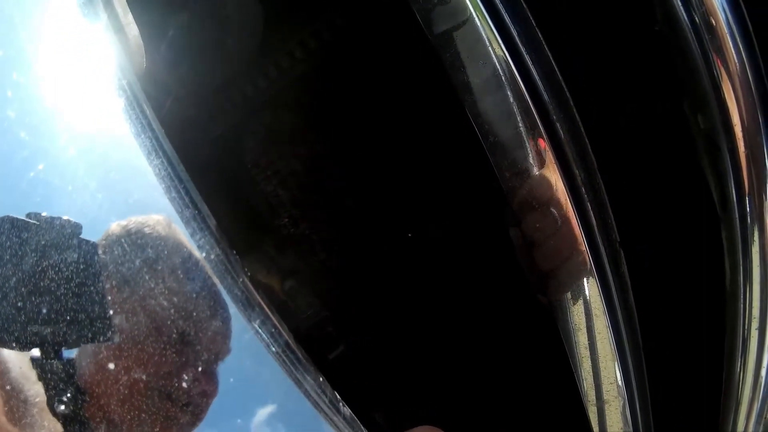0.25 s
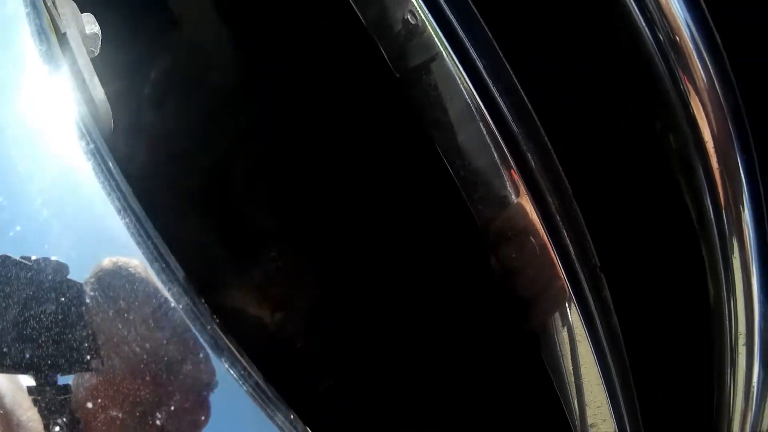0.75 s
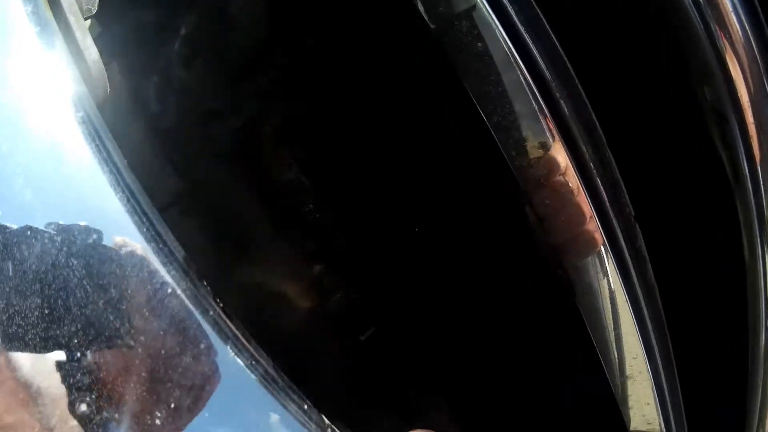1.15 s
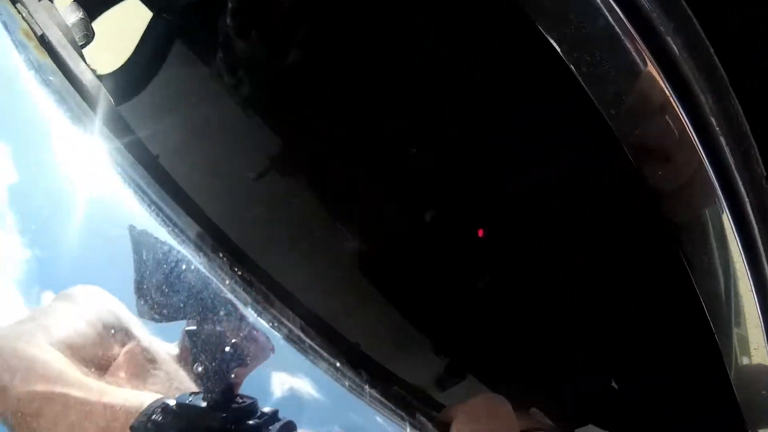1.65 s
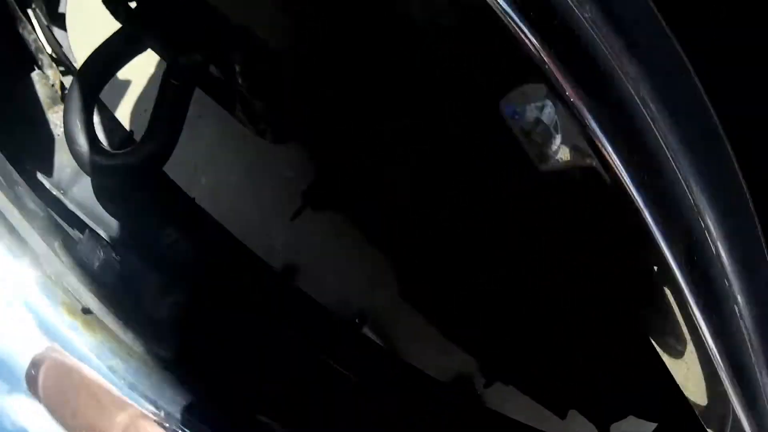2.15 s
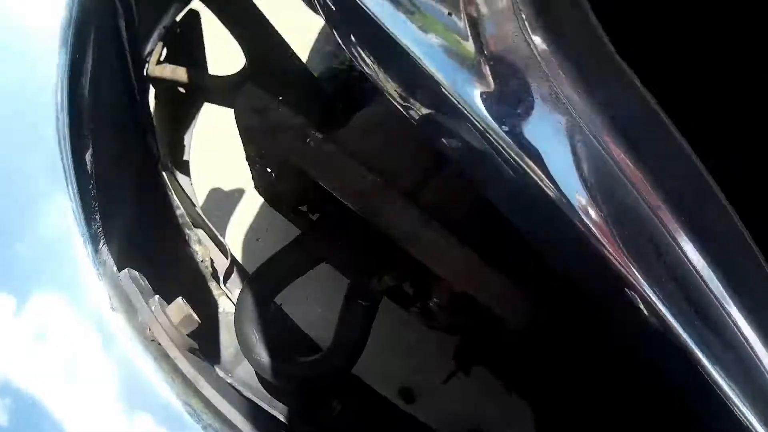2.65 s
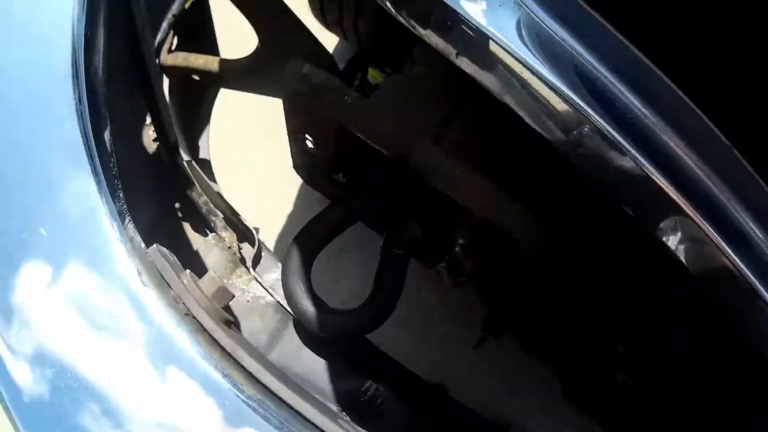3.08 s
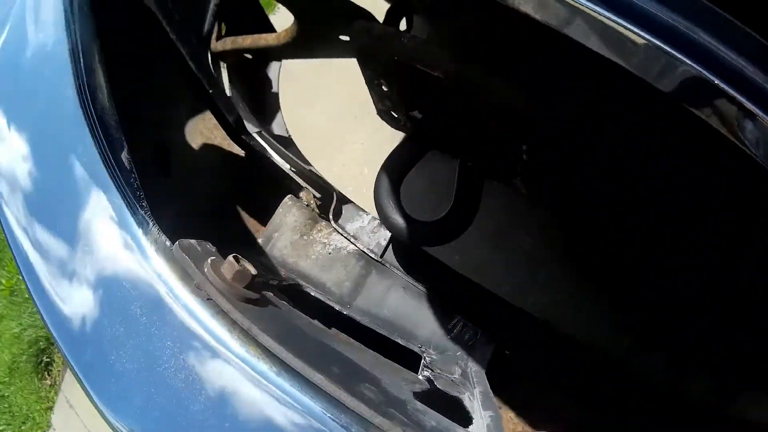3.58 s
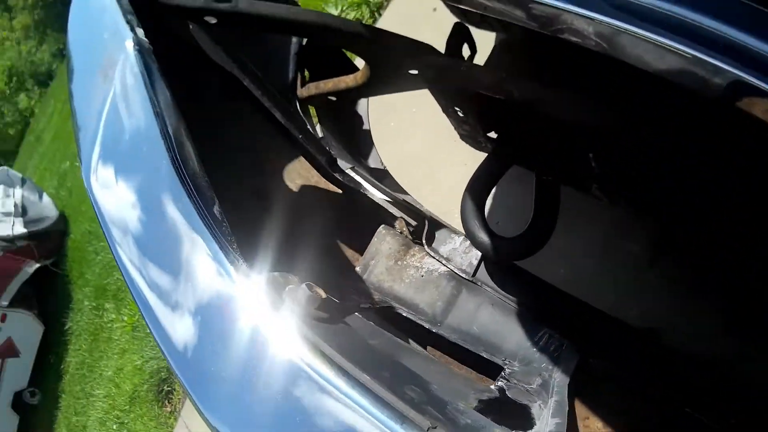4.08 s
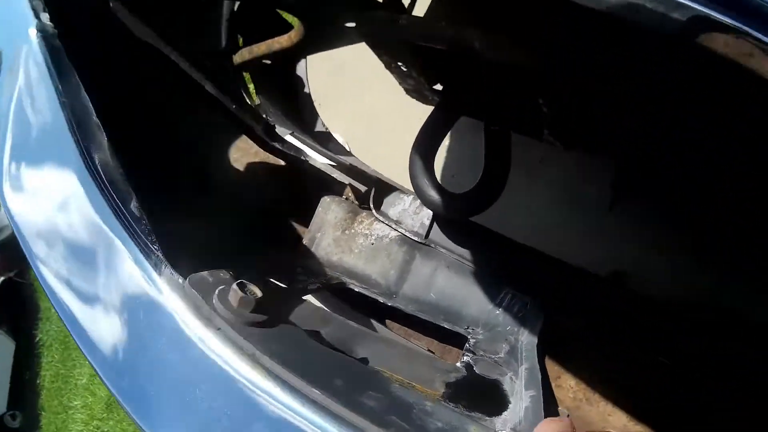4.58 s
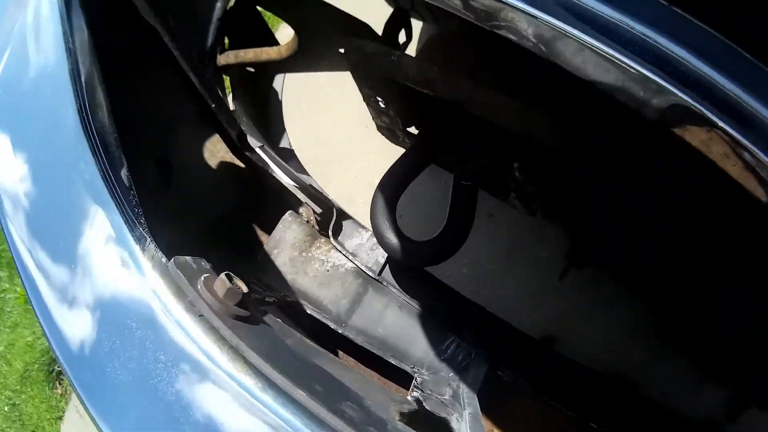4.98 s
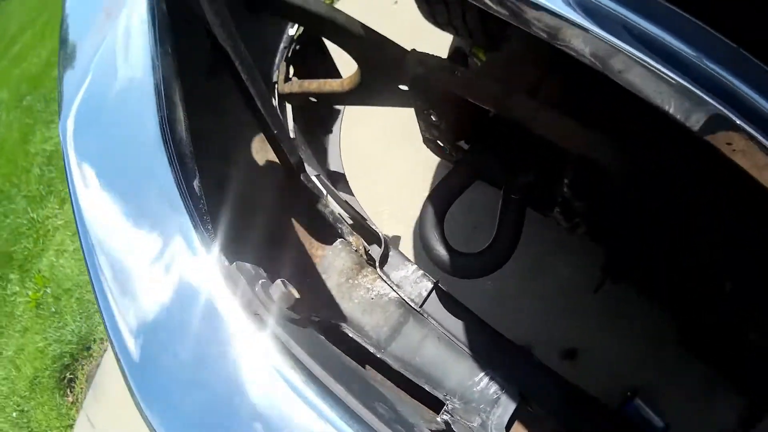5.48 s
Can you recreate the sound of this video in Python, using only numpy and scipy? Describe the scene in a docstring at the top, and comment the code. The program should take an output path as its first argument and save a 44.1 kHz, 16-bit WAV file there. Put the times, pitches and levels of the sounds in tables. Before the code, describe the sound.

Outdoors, a hand tool knocks, chatters and scrapes against a steel truck bumper, which rings briefly, with light handling rub underneath. A few dry plastic clicks snap right at the microphone. Faint taps follow, then a second bout of metal knocks and scrapes. The hand-held microphone is close to the work, with soft hiss, low rumble and a barely audible distant bird behind it.

```python
"""Outdoors, a hand-held microphone close to a steel truck bumper, where hand tools work at a fastener.
A far songbird opens, over low rumble, hum and the recorder's hiss. From 0.7 s a tool knocks, chatters
and scrapes on the bumper, which rings briefly; light handling rub runs underneath. From 2.1 to 2.6 s
dry plastic clicks snap right at the microphone. Faint taps follow, then from 4 s a second bout of
knocks and scrapes with two more clicks, and the hum comes up near the end."""
import sys
import numpy as np
from scipy import signal
from scipy.fft import rfft, irfft
from scipy.io import wavfile
from scipy.ndimage import uniform_filter1d

SR = 44100
rng = np.random.default_rng(int(sys.argv[2]) if len(sys.argv) > 2 else 0)


def unload_audio(sound):
    """Save the sound as a 16-bit wav file, at the path given as the first command line argument."""
    columns = np.transpose(np.atleast_2d(sound))
    # keep every value between -1 and 1, then stretch to whole-number steps
    steps = np.round(np.clip(columns, -1, 1) * 32767)
    wavfile.write(sys.argv[1], SR, steps.astype(np.int16))


N = 252683

# open air and hiss: (frequency [Hz], relative spectral density [dB])
AIR_SPECTRUM = [(20, -8), (60, -6), (130, -1.5), (250, -5.5), (500, -12), (1000, -17.5), (2500, -21),
                (5000, -25), (10000, -27), (15500, -30.5)]
# low hum: (time [s], level before trim [dB])
HUM_LEVELS = [(0, -59.5), (4.3, -64.5), (4.7, -49), (5.73, -54)]
# far bird: (time [s], level before trim [dB], starting pitch [Hz])
BIRD_WHISTLES = [(0.283, -68, 2270), (.39, -65, 2720), (.49, -64, 2280), (.59, -67, 2530),
                 (1.489, -56, 2390), (1.566, -57, 2480)]
# how hard the hand works, heard as rubbing: (time [s], level before trim [dB])
HAND_EFFORT = [(0.0, -66), (0.38, -68.5), (0.73, -48), (0.88, -39.5), (1.18, -38), (1.82, -58), (2.55, -48),
               (2.87, -63), (3.33, -60.5), (3.54, -54), (3.99, -56.5), (4.52, -46.5), (4.63, -34.5),
               (4.69, -55), (4.82, -70), (5.09, -45), (5.25, -50), (5.73, -40)]
# the registers thud, body, clang and edge: (low [Hz], high [Hz])
REGISTER_BANDS = [(70, 350), (350, 1150), (1150, 2800), (2800, 15000)]
# modes of the plastic housing: (frequency [Hz], relative level [dB], t60 [s])
HOUSING_MODES = [(273.5, -18.5, 0.079), (463, -8, 0.024), (870, 14.5, 0.0041), (948, -2, 0.031),
                 (1260, -7.5, 0.012), (1730, 2, 0.0075), (2250, -2.5, 0.0091), (2910, -16, 0.012),
                 (3400, -10.5, 0.0072), (4105, -7, 0.017), (4770, -3, 0.011), (5580, 0.5, 0.016),
                 (6750, -5.5, 0.0086), (10900, -19, 0.0097)]
# modes of bumper and bracket: (frequency [Hz], relative level [dB], undamped t60 [s])
BUMPER_MODES = [(119, -10, 0.145), (182, 1.5, 0.13), (255.5, -0.5, 0.28), (400, -12, 0.13),
                (475, -6.5, 0.014), (506, -3, 0.29), (582, 5, 0.086), (657, 3.5, 0.075), (733.6, -3, 0.55),
                (812.4, 11, 0.033), (937, 1, 0.13), (1053, -11, 0.33), (1280, -2.5, 0.19), (1335, -9, 0.32),
                (1448, 13.5, 0.022), (1550, -5, 0.31), (1638, -1.5, 0.081), (1682, 10.5, 0.064),
                (1775, -7.5, 0.16), (1818, 9.5, 0.039), (2032, 9, 0.028), (2090, -3, 0.11),
                (2500, -16, 0.12), (2695, -31, 0.063), (3400, -3, 0.073), (3800, 7, 0.049),
                (4180, 11, 0.024), (5520, -2.5, 0.18), (7300, -4, 0.12)]
# plastic clicks at the microphone: (time [s], body level [dB], thud [dB re body], clang [dB re body],
# edge [dB re body], relative after-ring [dB])
PLASTIC_CLICKS = [(2.0909, -12.5, -19.5, -8.5, -6.5, -9.5), (2.3916, -21, -21, -3, -14, -20),
                  (2.429, -38.5, 1, -1.5, -10, -32), (2.4689, -18, -3.5, 0.5, -10, -11.5),
                  (2.562, -36, -4, -19, -35, -26), (2.623, -29, -9.5, -4.5, -22, -19),
                  (4.245, -35.5, -17, -4.5, -23, -30), (5.2225, -28.5, -3, -11.5, -22, -19)]
# strokes of metal on metal: (time of hardest press [s], length [s], body level [dB],
# clang [dB re body], edge [dB re body], note of the spot [Hz])
TOOL_SCRAPES = [(1.408, 0.064, -37, 7.5, -12, 1304), (1.698, .056, -45, 15.5, -4, 1730),
                (1.725, 0.051, -40, 9, -18, 1417), (2.769, 0.065, -56.5, -1.5, -8, 2000),
                (3.774, 0.045, -56.5, -1.5, -17, 1087), (4.216, 0.045, -48.5, -1.5, -1, 1424),
                (4.645, 0.2, -47, 14.5, -2, 2107), (4.63, 0.053, -51, -3, 15.5, 3830),
                (4.779, .085, -32, -3.5, -13.5, 730), (5.15, 0.094, -41.5, 2.5, -4, 993),
                (5.44, 0.08, -40.5, -14.5, -14.5, 841), (5.558, 0.13, -48.5, -4, -7.5, 2190)]
# blows on the bumper: (time [s], body level [dB], thud [dB re body], clang [dB re body],
# edge [dB re body], rise [s], note of the spot [Hz])
TOOL_KNOCKS = [(0.7058, -18.5, -42, -20.5, -21, .0012, 1017), (0.7312, -30, -11, -20, -24, 0.0011, 1020),
               (0.9212, -34, -28, -12.5, -20.5, 0, 974), (0.997, -23, -6.5, 1, -27.5, 0.0038, 1482),
               (1.0502, -39, 6.5, -17, -31.5, 0, 584), (1.1827, -30.5, -8.5, -6.5, -41, .002, 1310),
               (1.2253, -40, -12, 10.5, -2, 0.00024, 2590), (1.2552, -13, -27, -6, -16, 0, 1346),
               (1.2853, -22.5, -21, 6.5, -5, 0, 1196), (1.6133, -28, -14, -4.5, -13.5, 0.0037, 1750),
               (1.638, -21, -28, 5, -4.5, 0.0027, 1600), (1.6712, -34, -11.5, 6.5, 1, 0.0012, 1750),
               (3.351, -48.5, -6, -12, -22, 0, 814), (3.4527, -54, 1, 2, -15, 0.0018, 1097),
               (3.5889, -48, -9, -13, -16, 0.0011, 510), (4.0752, -30, -6, -12, -27, 0.0024, 528),
               (4.4526, -33.5, -0.5, -10.5, -18.5, 0.0056, 838.5),
               (4.666, -14.5, -19, -13.5, -11, 0.0015, 842), (4.7238, -22.5, -25, 1, -4.5, 0.019, 740),
               (5.1529, -22.5, -12, -9, -20, 0.0041, 515), (5.3676, -36.5, -2.5, -14.5, -17.5, 0.0032, 837),
               (5.5777, -25, -2, -15.5, -22.5, 0, 660), (5.6566, -32, -3.5, -11, -26, 0, 647)]


def undb(db):
    """Decibels to gain."""
    return 10 ** (np.asarray(db) / 20)


def unit(x):
    """Scale to rms 1."""
    return x / np.sqrt(np.mean(x ** 2) + 1e-20)


def clock(length):
    """Sample times over a length in seconds."""
    return np.arange(int(length * SR)) / SR


def decay(t, t60):
    """Envelope that falls 60 dB in t60 seconds."""
    return np.exp(-np.log(1000) * t / t60)


def curve(rows):
    """Join (time, value) rows by straight lines."""
    return np.interp(np.arange(N) / SR, *np.transpose(rows))


def band(x, low_hz, high_hz, order=2):
    """Butterworth band-pass."""
    return signal.sosfilt(signal.butter(order, [low_hz, high_hz], "band", fs=SR, output="sos"), x)


def soften(x, hz, order=1):
    """Butterworth low-pass."""
    return signal.sosfilt(signal.butter(order, min(hz, SR / 2 - 1), fs=SR, output="sos"), x)


def add(out, start_s, x):
    """Mix x into out from start_s on."""
    i = int(start_s * SR)
    out[i:i + len(x)] += x[:N - i]


def wander(rate_hz):
    """Smooth random drift, rms 1."""
    hold = int(SR / rate_hz)
    steps = np.repeat(rng.standard_normal(N // hold + 1), hold)
    return unit(uniform_filter1d(steps, hold)[:N])


def contacts(n, per_s, spread_db):
    """Sparse tiny impacts of uneven size, rms 1."""
    impacts = (rng.random(n) < per_s / SR) * rng.choice([-1, 1], n)
    sizes = undb(spread_db * np.clip(rng.standard_normal(n), -2, 2))
    return unit(impacts * sizes)


def ring(modes, t):
    """Impulse response of a table of modes; neighbours swing in opposite senses."""
    return sum((-1) ** k * undb(db) * decay(t, t60) * np.sin(2 * np.pi * hz * t)
               for k, (hz, db, t60) in enumerate(modes))


def struck_at(modes, scatter_db):
    """Each contact lands on a new spot and favours other modes."""
    return [(hz, db + scatter_db * rng.standard_normal(), t60) for hz, db, t60 in modes]


def voiced(x, span_s, body_db, thud_db, clang_db, edge_db):
    """A contact's spot and hardness set each register's level, taken over the first span_s."""
    out = 0
    for (low_hz, high_hz), db in zip(REGISTER_BANDS, (thud_db, 0, clang_db, edge_db)):
        part = band(x, low_hz, high_hz, order=4)
        opening_rms = np.sqrt(np.mean(part[:int(span_s * SR)] ** 2))
        out = out + part * undb(body_db + db) / opening_rms
    return out


def air(level_db=-55.5):
    """Open air and steady hiss at the microphone, strongest in the lows."""
    hz, db = np.transpose(AIR_SPECTRUM)
    log_hz = np.log(np.fft.rfftfreq(N, 1 / SR) + 1)
    colour = undb(np.interp(log_hz, np.log(hz), db))
    noise = irfft(rfft(rng.standard_normal(N)) * colour, N)
    return unit(noise) * undb(level_db + 0.5 * wander(5.25))


def rumble(usual_db=-52.5, usual_effort_db=-51, db_per_effort_db=0.52):
    """Low rumble that follows the effort of the hand."""
    level_db = usual_db + db_per_effort_db * (curve(HAND_EFFORT) - usual_effort_db)
    return unit(band(rng.standard_normal(N), 26.8, 133)) * undb(level_db)


def hum(hz=124.6, trim_db=0.5):
    """A low hum, wavering in pitch and level."""
    tone = np.sin(2 * np.pi * hz * np.arange(N) / SR + 0.7 * wander(13))
    return unit(tone) * undb(curve(HUM_LEVELS) + trim_db + 2 * wander(4.4))


def whine(hz=9518, level_db=-77):
    """A thin electronic whine, barely above the hiss."""
    tone = np.sin(2 * np.pi * hz * np.arange(N) / SR + 0.9 * wander(60))
    return unit(tone) * undb(level_db)


def hiss_swells(first_s=0.61, every_s=1, length_s=0.155, level_db=-62.5):
    """A faint extra hiss comes and goes at a steady pace."""
    gate = (np.arange(N) / SR - first_s) % every_s < length_s
    hiss = unit(band(rng.standard_normal(N), 2000, 15000, order=1))
    return hiss * soften(1.0 * gate, 28) * undb(level_db)


def far_bird(slur_ratio=1.17, length_s=0.07, trim_db=-4):
    """A songbird far from the microphone: short upward slurs that waver in level."""
    out, t = np.zeros(N), clock(length_s)
    for start_s, db, hz in BIRD_WHISTLES:
        phase = 2 * np.pi * np.cumsum(np.linspace(hz, hz * slur_ratio, len(t))) / SR
        add(out, start_s, undb(db) * unit(np.sin(phase) * np.sin(np.pi * t / length_s)))
    return out * undb(trim_db + 3 * wander(94))


def handling_rub(steel_db=-2, tap_db=2, trim_db=-1):
    """Hand and tool rub close by: a dull, uneven rustle that stirs the steel, with stray light taps."""
    friction = contacts(N, per_s=3000, spread_db=5) * undb(4.5 * wander(45))
    rustle = unit(band(friction, 260, 1253, order=1))
    taps = undb(tap_db) * contacts(N, per_s=22, spread_db=4)
    steel = unit(signal.fftconvolve(unit(friction) + taps, ring(BUMPER_MODES, clock(0.3)))[:N])
    rub = unit(soften(rustle + undb(steel_db) * steel, 1540))
    return rub * undb(curve(HAND_EFFORT) + trim_db)


def plastic_clicks(crack_db=-8, crack_t60=0.037, ring_hz=598, ring_t60=0.18):
    """Dry snaps in the plastic housing, right at the microphone; one low mode rings on."""
    out, t = np.zeros(N), clock(0.2)
    for start_s, body_db, thud_db, clang_db, edge_db, ring_db in PLASTIC_CLICKS:
        crack = soften(rng.standard_normal(len(t)), 4300, order=2) * decay(t, crack_t60)
        housing = ring(struck_at(HOUSING_MODES, scatter_db=5.5), t)
        after_ring = ring([(ring_hz, ring_db, ring_t60)], t)
        snap = housing + after_ring + undb(crack_db) * crack
        add(out, start_s, voiced(snap, 0.011, body_db + 0, thud_db, clang_db, edge_db))
    return out


def bumper(note_hz, note_db, note_t60, dense_db, dense_t60, cavity_db, cavity_t60):
    """The steel's response at one spot: main modes, the spot's note, dense modes, the cavity behind."""
    t = clock(0.35)
    dense = unit(soften(rng.standard_normal(len(t)) * decay(t, dense_t60), 3400))
    cavity = unit(band(rng.standard_normal(len(t)) * decay(t, cavity_t60), 140, 2400))
    note = unit(ring([(note_hz, 0, note_t60)], t))
    damping = decay(t, t60=0.57)  # the tool stays in contact
    modes = unit(soften(damping * ring(struck_at(BUMPER_MODES, scatter_db=4), t), 4500))
    return modes + undb(note_db) * note + undb(dense_db) * dense + undb(cavity_db) * cavity


def tool_scrapes():
    """Close by, metal catches and slips on the bumper in tiny jerks, pressed harder and then let go."""
    out, t = np.zeros(N), clock(0.45)
    thud_db = -16  # re body: sliding hardly shakes the bumper
    for hardest_s, length_s, body_db, clang_db, edge_db, note_hz in TOOL_SCRAPES:
        pressure = np.interp(t, [0, length_s / 2, length_s], [0, 1, 0])
        force = pressure * contacts(len(t), per_s=1100, spread_db=5.5)
        steel = bumper(note_hz, note_db=-1, note_t60=0.08, dense_db=-1, dense_t60=0.036,
                       cavity_db=-19, cavity_t60=0.31)
        scrape = soften(signal.fftconvolve(force, steel)[:len(t)], 5600, order=2)
        add(out, hardest_s - length_s / 2, voiced(scrape, length_s, body_db, thud_db, clang_db, edge_db))
    return out


def tool_knocks(first_contact_db=22, glancing_s=0.0027):
    """Close by, the tool strikes the bumper once, then chatters loosely to rest on the ringing steel."""
    out, t = np.zeros(N), clock(0.45)
    for start_s, body_db, thud_db, clang_db, edge_db, rise_s, note_hz in TOOL_KNOCKS:
        chatter_t60 = 0.09 * 2 ** (-clang_db / 17.5)  # longer where the steel clangs less
        attack = np.minimum((t + 1 / SR) / (rise_s + 1 / SR), 1)
        force = contacts(len(t), per_s=1300, spread_db=4.5) * attack * decay(t, chatter_t60)
        # a glancing blow rises slowly and has no sharp first contact
        force[0] += undb(first_contact_db) * np.exp(-rise_s / glancing_s)
        steel = bumper(note_hz, note_db=-3, note_t60=0.058, dense_db=2, dense_t60=0.019,
                       cavity_db=-12, cavity_t60=0.24)
        cutoff_hz = 11000 * undb(0.35 * edge_db)  # harder blows reach higher
        knock = soften(signal.fftconvolve(force, steel)[:len(t)], cutoff_hz, order=2)
        add(out, start_s, voiced(knock, 0.024, body_db, thud_db, clang_db, edge_db))
    return out


def scene():
    """The close work and the background behind it, at one microphone."""
    close = tool_knocks() + tool_scrapes() + plastic_clicks() + handling_rub()
    background = far_bird() + air() + rumble() + hum() + whine() + hiss_swells()
    return (close + background)[None]


def record(dry, top_hz=15900):
    """The recorder overloads on any peak past full scale and cuts the highest treble."""
    top_cut = signal.ellip(8, 0.2, 70, top_hz, fs=SR, output="sos")
    return signal.sosfilt(top_cut, np.clip(dry, -1, 1))


dry = scene()
out = record(dry)
unload_audio(out)
```